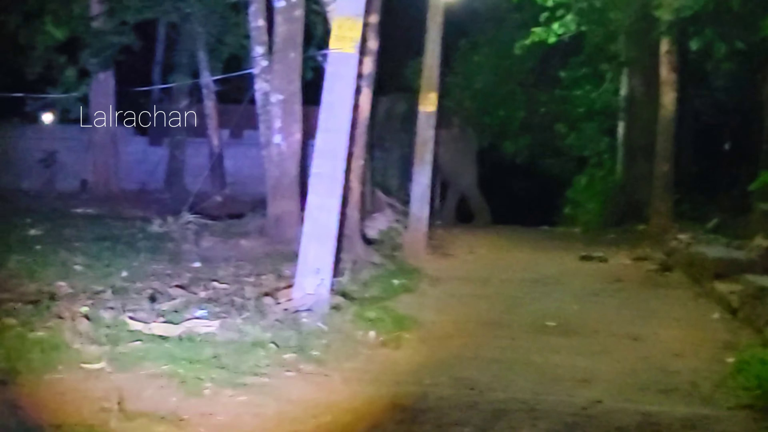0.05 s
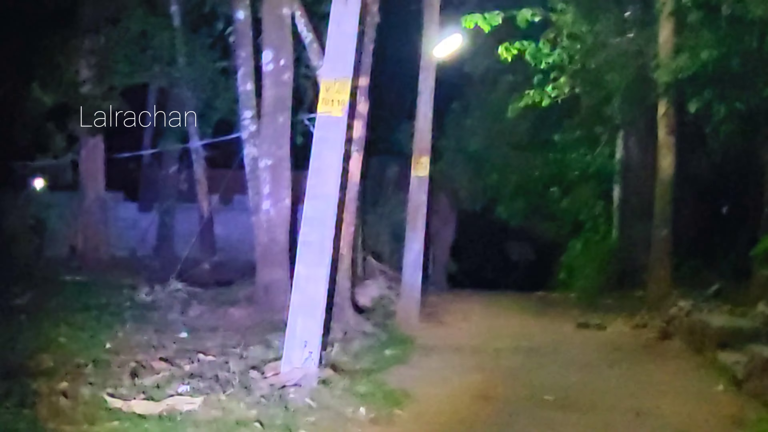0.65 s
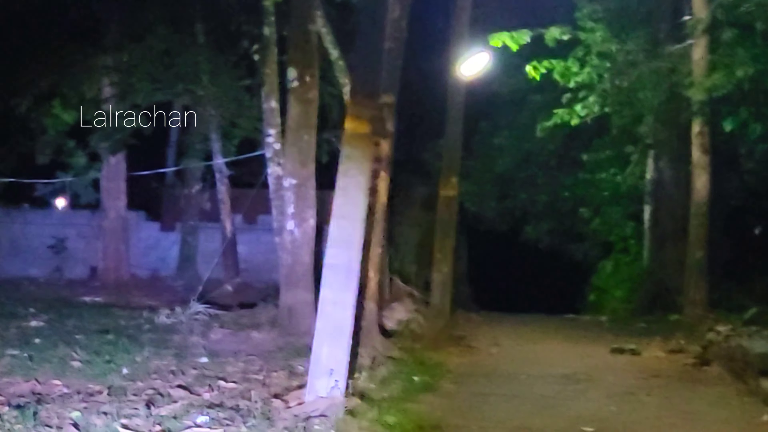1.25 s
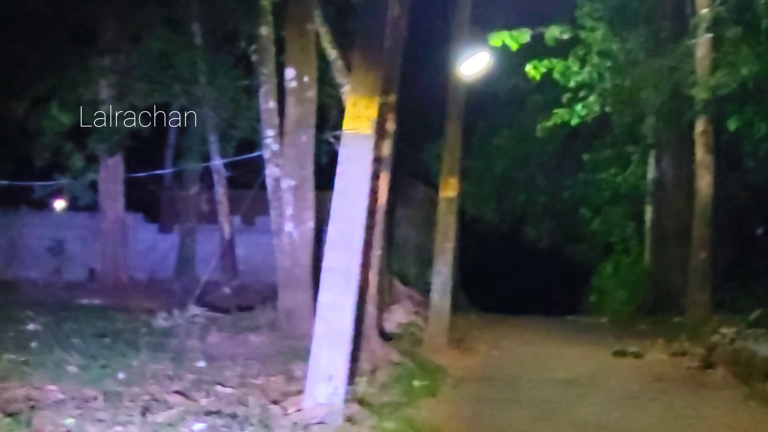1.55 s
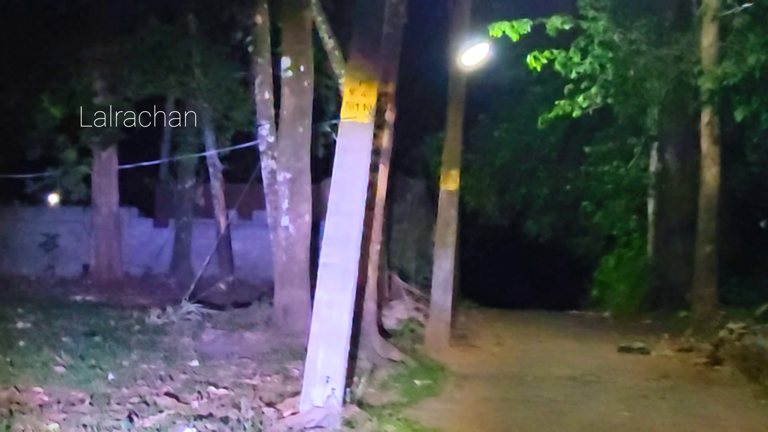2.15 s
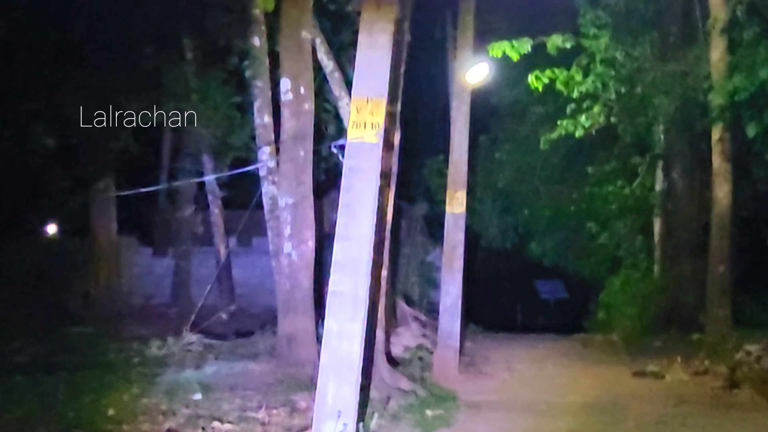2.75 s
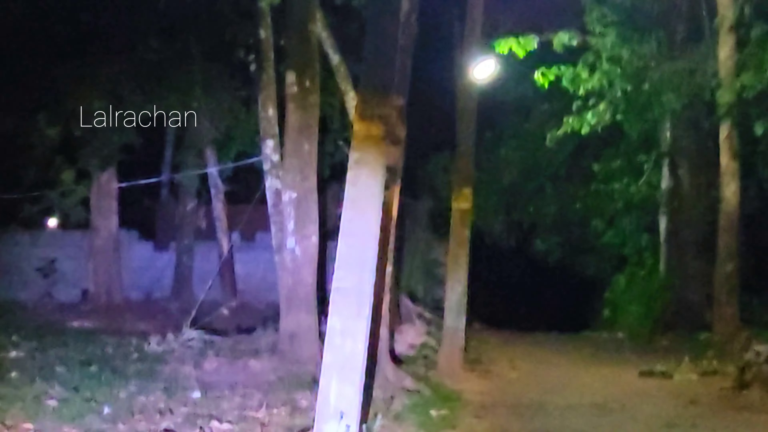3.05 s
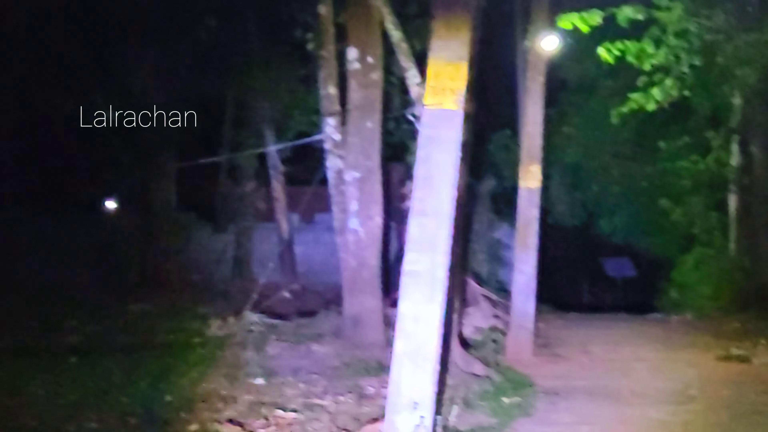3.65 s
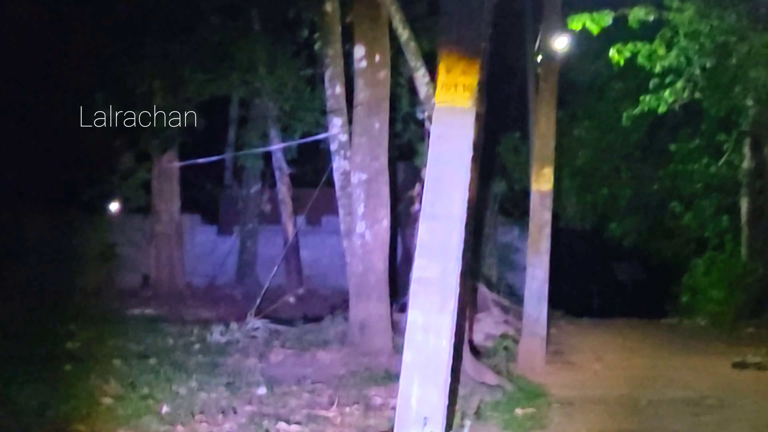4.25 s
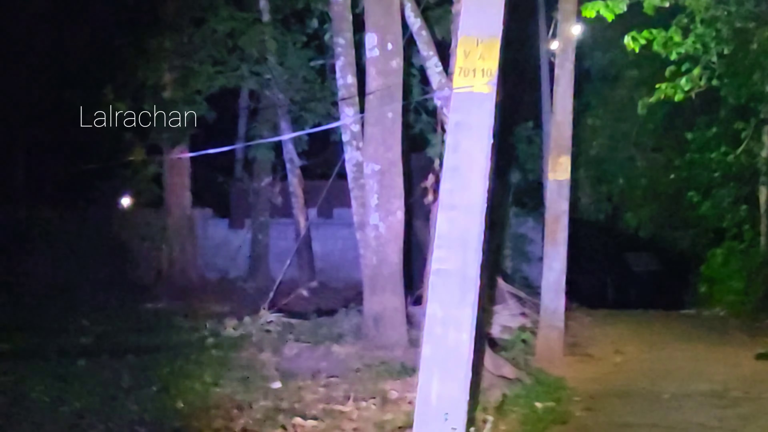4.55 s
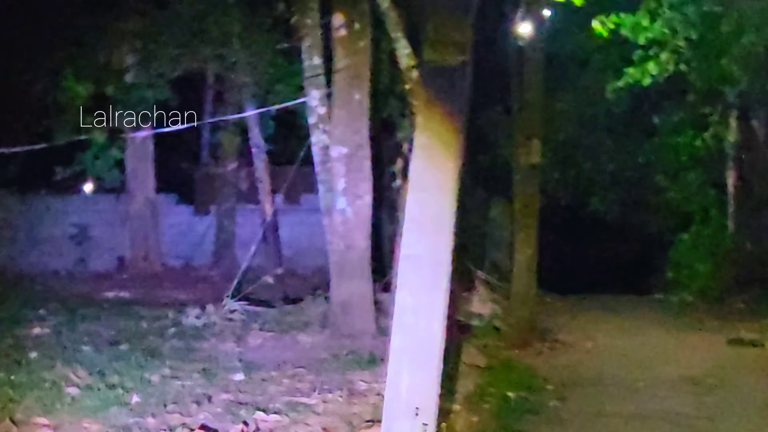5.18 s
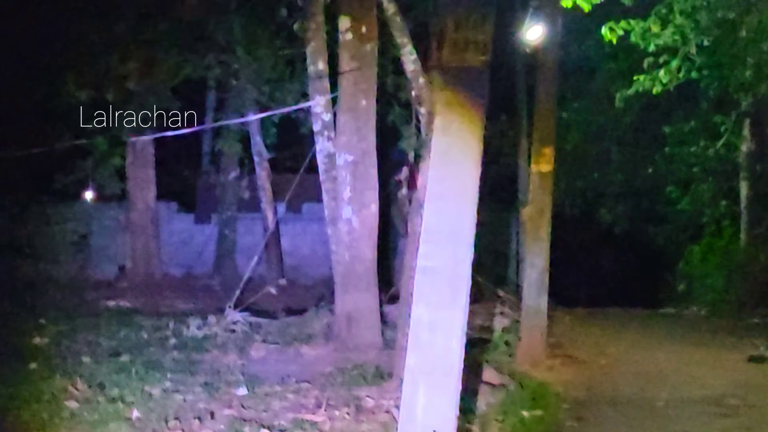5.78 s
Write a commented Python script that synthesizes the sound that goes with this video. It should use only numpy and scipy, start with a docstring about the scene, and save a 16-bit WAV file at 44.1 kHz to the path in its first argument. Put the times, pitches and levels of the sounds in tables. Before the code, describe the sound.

Slow footsteps crunch along a dirt path in night woodland for about six seconds, a little under two steps a second, close to a hand-held microphone. Soles grind grit and sand, and small stones snap sharply, most clearly at about 1.1, 2.4 and 3.9 seconds. Dry leaves give thin, bright cracks near 1.2 and 3.3 seconds. Each stride brings a dull handling knock and a faint, low rustle of clothing. The steps grow lighter after about 4.5 seconds.

Behind them, a steady, high chorus of distant insects trembles throughout, leaning to the right. One nearby cricket gives short, irregular double chirps. A higher one rasps about five times a second, dropping away briefly around 1 second and strongest near 3.8 seconds. Three faint, short, falling hoots echo through the trees at about 0.2, 3 and 4.5 seconds, over a soft hiss of air.

```python
"""Night walk in the woods

Slow steps on a dirt path, heard from a hand-held phone. Soles grind grit and sand, small stones
snap, dry leaves crack, and each stride knocks dully on the phone's case. Two nearby crickets
stroke their wings among the trees, over a steady far insect chorus, three faint hoots, soft air
and a low rustle of clothing."""
import sys
import numpy as np
from scipy import signal
from scipy.fft import rfft, irfft
from scipy.io import wavfile
from scipy.ndimage import uniform_filter1d

SR = 44100
rng = np.random.default_rng(int(sys.argv[2]) if len(sys.argv) > 2 else 0)


def transcribe(u):
    """Save the signal u as a 16-bit wav file named by the first command-line argument.

    u: samples, shape (n,) or (channels, n), limited to [-1, 1]; the rate is SR.
    q: integer samples, one column per channel.
    """
    v = np.clip(np.atleast_2d(u).T, -1, 1)
    q = np.round(v * 32767).astype(np.int16)
    wavfile.write(sys.argv[1], SR, q)


N = 261072
T = np.arange(N) / SR
FREQ = np.maximum(np.arange(N // 2 + 1) * SR / N, 1)

# footsteps, a heel strike and then the roll of the sole:
# heel_s, heel_rise_s, heel_db, roll_delay_s, roll_db, roll_fall_s, grit_offset_db, dust_offset_db
FOOTSTEPS = [(.013, 0.022, -52, 0.15, -57.5, 0.094, 4, -9.5),
             (.63, 0.025, -58, 0.075, -58.5, 0.23, 1.5, -14),
             (1.122, 0.014, -41.5, 0.048, -50, 0.093, 3.5, -6),
             (1.6, 0.063, -65, 0.082, -56, 0.18, -2.5, -4.5),
             (2.288, 0.0096, -47.5, 0.16, -57.5, 0.078, 2.5, -7),
             (2.787, 0.014, -43, 0.075, -54.5, 0.12, -3, -16),
             (3.341, 0.0097, -51, 0.13, -52, 0.055, -1, -7.5),
             (3.929, 0.0084, -45, 0.082, -56, 0.11, 3, -13),
             (4.55, 0.056, -61, 0.073, -62.5, 0.21, 0.5, -9),
             (5.048, 0.0061, -50, 0.031, -58, 0.11, -4.5, -14),
             (5.68, .015, -65.5, 0.026, -65, 0.17, 6, -1.5)]


def undb(db):
    """Decibels to gain."""
    return 10 ** (np.asarray(db) / 20)


def unit(x):
    """Scale to rms 1."""
    return x / np.sqrt(np.mean(x ** 2))


def pan(db):
    """Stereo gains for a left minus right level: negative leans right."""
    return undb(np.array([[db], [-db]]) / 2)


def colour(x, points):
    """EQ along a curve of (freq_hz, gain_db) points."""
    hz, db = np.transpose(points)
    return irfft(rfft(x) * undb(np.interp(np.log(FREQ), np.log(hz), db)), N)


def high_pass(hz, q):
    """Response of a resonant second-order high-pass."""
    s = 1j * FREQ / hz
    return s * s / (s * s + s / q + 1)


def wander(rate_hz):
    """Smooth random drift with a spread near 1."""
    hold = max(int(SR / rate_hz), 32)
    stairs = np.repeat(rng.standard_normal(N // 32 + 1)[:N // hold + 1], hold)
    return 1.3 * uniform_filter1d(uniform_filter1d(stairs, hold), hold)[:N]


def tone(hz):
    """A sine that follows a pitch curve."""
    return np.sin(2 * np.pi * np.cumsum(hz) / SR)


def add(out, start_s, x):
    """Mix x in at start_s."""
    i = max(int(start_s * SR), 0)
    out[..., i:i + x.shape[-1]] += x[..., :max(N - i, 0)]


def swell(t, peak_s, rise_s, fall_s):
    """Power of a push that builds up to peak_s and dies away."""
    age = t - peak_s
    return np.exp(-np.where(age < 0, (age / rise_s) ** 2, 2 * np.abs(age / fall_s) ** 1.03))


def swells(times, rise_s, fall_s, rest_db, swell_db):
    """Gain with a resting floor and a swell on top at each of the times."""
    t = T[::32]
    shape = np.max([swell(t, peak_s, rise_s, fall_s) for peak_s in times], axis=0)
    return np.interp(T, t, np.sqrt(undb(rest_db) ** 2 + undb(swell_db) ** 2 * shape))


def woods(x, direct_db, t60_s):
    """Trunks and leaves scatter a sound into a different tail at each microphone."""
    t = T[:SR]
    tail = rng.standard_normal((2, len(t))) * undb(-60 * t / t60_s) * (1 - np.exp(-t / 0.0008))
    tail /= np.sqrt(np.sum(tail ** 2, axis=1, keepdims=True))
    wet = signal.fftconvolve(x[None], tail, axes=1)[:, :N]
    return (undb(direct_db) * x + wet) / np.hypot(1, undb(direct_db))


def microphones(x):
    """Sound from the ground reaches the left microphone a moment earlier; the right one is brighter."""
    left = colour(x, [(500, 0), (1200, -2.5), (2400, -5.0)])
    right = colour(x, [(500, -0.5), (1200, -1.5), (2400, 4.0)])
    return np.array([left, np.roll(right, 2)])


def air_and_clothes():
    """Soft hiss on each side, a low rustle of clothing with each stride and a far hum that swells once."""
    # noise beds, the air at each side and the clothing in the centre: freq_hz, level_db
    air_left = [(20, -107), (70, -95), (300, -102), (600, -101), (1300, -104), (2500, -112), (4000, -108),
                (6000, -117), (9000, -119), (16000, -125)]
    air_right = [(20, -94), (70, -85), (180, -90), (350, -100), (1500, -107), (2400, -100), (4000, -99),
                 (6000, -103), (8600, -111), (12000, -115), (15500, -113)]
    clothes_eq = [(30, -108), (170, -94.5), (300, -100), (580, -96.5), (1000, -103), (2000, -116),
                  (5000, -135)]
    left, right, clothes = rng.standard_normal((3, N)) * np.sqrt(SR / 2)
    hum = tone(178 + 9 * wander(40)) * undb(2.0 * wander(9.3))
    hum *= swells([2.01], rise_s=0.33, fall_s=0.17, rest_db=-78.5, swell_db=-62.5)
    after_steps = [step[0] + .13 for step in FOOTSTEPS]
    strides = swells(after_steps, rise_s=0.21, fall_s=0.29, rest_db=-3, swell_db=-0.5)
    clothes = colour(clothes, clothes_eq) * strides * undb(0.67 * wander(6))
    return np.array([colour(left, air_left), colour(right, air_right)]) + clothes + hum


def far_chorus():
    """Countless far insects merge into one trembling band for each kind."""
    # insect bands: centre_hz, half_width_hz, level_db, pan_db, flutter_hz
    bands = [(3163, 167, -68, -7.5, 30), (4814, 330, -66, -8, 57), (6520, 210, -77.5, -16, 49),
             (7200, 324, -70.5, -15, 50), (9920, 470, -72, -5.5, 44)]
    out = 0
    for centre_hz, half_width_hz, level_db, pan_db, flutter_hz in bands:
        rolloff = (1 + ((FREQ - centre_hz) / half_width_hz) ** 2 / 6) ** 3
        band = unit(irfft(rfft(rng.standard_normal((2, N))) / rolloff, N))
        tremble_db = 0.63 * wander(5) + 1.86 * wander(flutter_hz)
        out = out + band * undb(level_db + tremble_db) * pan(pan_db)
    return out


def far_hoots():
    """Short, soft falling tones that echo through the trees."""
    # faint low hoots: start_s, pitch_hz, level_db
    hoots = [(0.236, 435, -56), (3.012, 430, -56), (4.55, 437, -66)]
    phase, out = np.linspace(0, 1, int(SR * .08)), np.zeros(N)
    for start_s, pitch_hz, level_db in hoots:
        glide_hz = pitch_hz * (1 + 0.23 * (.5 - phase))
        add(out, start_s, undb(level_db) * np.sin(np.pi * phase) * tone(glide_hz))
    return woods(out, direct_db=1, t60_s=0.47)


def chirping_cricket():
    """The lower cricket: two wing strokes a chirp, each falling in pitch as the wing slows."""
    # two-syllable chirps: start_s, level_db, second_offset_db
    chirps = [(.215, -48, -15), (.553, -48.5, -13), (1.235, -49, -5), (1.585, -48.5, -3.5),
              (2.32, -47.5, -10), (3.015, -49, -3), (3.46, -60, 9), (4.17, -55.5, 4), (4.685, -52, -1),
              (5.58, -51, -12)]
    pitch_hz, sweep_hz, spacing_s = 3360, 600, .043
    out, waver_hz = np.zeros(N), 90 * wander(500)
    for chirp_s, level_db, second_offset_db in chirps:
        for start_s, db in (chirp_s, level_db), (chirp_s + spacing_s, level_db + second_offset_db):
            detune, stretch = rng.standard_normal(2)
            phase = np.linspace(0, 1, int(SR * 0.0245 * np.exp(0.087 * stretch)))
            hz = pitch_hz * (1 + 0.011 * detune) + sweep_hz * (.5 - phase)
            hz += waver_hz[int(start_s * SR):][:len(phase)]
            add(out, start_s, undb(db) * np.sin(np.pi * phase) * tone(hz))
    out *= unit(undb(5 * np.clip(wander(450), -2, 1.5)))  # the teeth of the wing catch unevenly
    return undb(3.5) * woods(out, direct_db=-10, t60_s=.6) * pan(-6.5)


def rasping_cricket():
    """The higher cricket: runs of quick, uneven wing strokes in a rhythm that slowly slackens."""
    # level ride of the rasps: time_s, level_db
    ride = [(.3, -60), (.65, -89), (1.2, -84), (1.55, -63.5), (3.8, -56.5), (4.5, -61), (5.9, -62.5)]
    pitch_hz, sweep_hz, stroke_hz = 4880, 720, 90
    start_s, length_s, period_s, slowing_s = .108, 0.081, .19994, .00088
    rasp = np.abs(np.sin(np.pi * np.linspace(0, 1, int(SR * length_s)))) ** 0.29
    envelope = np.zeros(N)
    while start_s < T[-1]:
        level_db = np.interp(start_s, *np.transpose(ride)) + rng.standard_normal()
        add(envelope, start_s, undb(level_db) * rasp)
        start_s += period_s
        period_s += slowing_s
    stroke_phase = np.cumsum(stroke_hz * np.exp(.3 * wander(90))) / SR % 1
    hz = pitch_hz + sweep_hz * (.5 - stroke_phase) + 170 * wander(700)
    song = envelope * np.sin(np.pi * stroke_phase) * tone(hz)
    return undb(7.0) * woods(song, direct_db=-2, t60_s=.3) * pan(-7.5)


def handling():
    """Knocks and finger rumble cross the case, mainly to the right; the bass cut makes knocks swing."""
    # knocks as the strides jolt the hand: time_s, level_db
    knocks = [(.18, -30), (.2, -16), (0.647, -33.5), (0.726, -35), (0.8194, -19.5), (1.232, -30.5),
              (1.521, -38), (1.729, -32.5), (1.903, -20.5), (2.122, -39), (2.437, -31.5), (2.4727, -20),
              (2.858, -32.5), (2.995, -20), (3.042, -29.5), (3.543, -27), (4.123, -21.5), (4.175, -26),
              (4.6928, -20.5), (5.086, -24.5), (5.246, -25)]
    hardest_hz, hardest_db, db_per_octave = 770, -20.5, 10
    t, push = T[:2048] - .01, np.zeros(N)
    for time_s, level_db in knocks:
        # a stronger knock is a harder one, up to a limit
        hardness_hz = hardest_hz * 2 ** (min(level_db - hardest_db, 0) / db_per_octave)
        age = np.pi * hardness_hz * t
        force = np.exp(np.minimum(2.0 * age, -.8 * age))  # builds to a sharp point, lets go more slowly
        add(push, time_s + t[0] + .0005, -undb(level_db) * force)
    thumps = irfft(rfft(push) * high_pass(hz=65.5, q=1.45) * high_pass(hz=42.0, q=0.76), N)
    thumps = colour(thumps, [(70, 3.5), (160, 2.5), (400, 2), (900, 2.5), (1800, 1), (3000, 2), (6000, 5)])
    finger_eq = [(20, -16), (65, 4.5), (120, -10), (250, -15.5), (700, -19), (3000, -43)]
    fingers = unit(colour(rng.standard_normal(N), finger_eq))
    grip = swells([knock[0] for knock in knocks], rise_s=0.12, fall_s=0.13, rest_db=-67, swell_db=-56)
    fingers *= grip * undb(1.2 * wander(16))
    return (thumps + fingers) * undb([[-34], [0]])


def leaf_litter():
    """Dry leaf bits break with thin, very bright cracks; a small crumb follows every step."""
    # featured cracks: start_s, level_db
    cracks = [(1.183, -26.5), (1.187, -26), (2.436, -42), (3.252, -47), (3.339, -32), (3.938, -36),
              (4.002, -41)]
    crumbs = [(step[0] + rng.uniform(0, 0.18), -52 + rng.uniform(-8, 8)) for step in FOOTSTEPS]
    t, out = T[:1024], np.zeros((2, N))
    for start_s, level_db in list(cracks) + crumbs:
        add(out, start_s, undb(level_db) * rng.standard_normal((2, len(t))) * np.exp(-t / 0.0024))
    return colour(out, [(1000, -27), (4000, -3.5), (8000, -2.5), (11000, -2), (16000, -5)]) * pan(-2.7)


def pebbles(grit_gain, per_step):
    """Rows for stones(): pebbles slip at random as a sole rolls, louder where it grinds harder."""
    span_s, over_grit_db, centre_hz, spread_octaves, tick_db = .17, 13.5, 1400, 0.67, -12.5
    heel_s = np.repeat([step[0] for step in FOOTSTEPS], per_step)
    start_s = heel_s + span_s * rng.random(len(heel_s))
    size, pitch = np.clip(rng.standard_normal((len(heel_s), 2)), -1.5, 1.5).T
    level_db = 20 * np.log10(np.interp(start_s, T, grit_gain)) + over_grit_db + 3 * size
    pitch_hz = centre_hz * 2 ** (spread_octaves * pitch)
    return list(zip(start_s, level_db, pitch_hz, np.full(len(heel_s), tick_db)))


def stones(grit_gain):
    """A stone slips: a knock of two or three cycles, damped by the earth, with a splintery tick."""
    # featured snaps under a sole: start_s, level_db, pitch_hz, tick_offset_db
    snaps = [(.049, -31.5, 930, -22), (.1228, -27.5, 2010, -2.5), (.708, -39.5, 1680, -4),
             (.96, -39.5, 2210, -1.5), (1.1023, -23, 705, -13), (1.116, -40, 900, -14),
             (1.124, -21, 1020, -11), (1.182, -25, 1150, -2.5), (1.325, -35.5, 1520, -1),
             (2.274, -38.5, 2500, 0), (2.321, -28.5, 1220, -2.5), (2.353, -33, 1260, -6),
             (2.3887, -10, 1170, -35), (2.7965, -31.5, 2270, -2), (3.338, -44, 1480, 3),
             (3.44, -33.5, 850, -18), (3.4597, -23.5, 1230, -12), (3.5454, -38, 3100, 5),
             (3.871, -41.5, 2420, 7), (3.9205, -29, 1670, -5), (3.9237, -14, 1480, -6.5),
             (3.925, -14.5, 780, -15), (3.9376, -20.5, 1240, -9), (3.9484, -16.5, 676, -10.5),
             (5.047, -41.5, 3070, -1), (5.721, -41, 1380, -3)]
    # tone of the tick: freq_hz, gain_db
    tick_eq = [(100, -39), (1000, 8), (3000, 7.5), (5000, -3.5), (7500, 0.5), (10000, -19), (16000, -10)]
    t, knocks, ticks = T[:2048], np.zeros(N), np.zeros((2, N))
    tick_decay = np.exp(-t / 0.00058) + 0.098 * np.exp(-t / 0.016)
    for start_s, level_db, pitch_hz, tick_offset_db in list(snaps) + pebbles(grit_gain, per_step=6):
        half_cycles = 2 * pitch_hz * t
        envelope = (half_cycles * np.exp(1 - half_cycles)) ** 1.19
        add(knocks, start_s, undb(level_db) * envelope * np.sin(2 * np.pi * pitch_hz * t))
        tick = rng.standard_normal((2, len(t))) * tick_decay
        add(ticks, start_s, undb(level_db + tick_offset_db) * tick)
    knocks = colour(knocks, [(100, 0), (400, -10.5), (900, 0.5), (1800, 0.5), (4000, 10)])
    near = microphones(knocks) + colour(ticks, tick_eq) * pan(-7.5)
    return near + undb(-21.0) * woods(near.mean(axis=0), direct_db=-33, t60_s=0.44)


def footwork():
    """Gains of grit, sand and dust over time: heels strike, soles roll, a swinging foot skims."""
    # skims over the sand: peak_s, level_db, rise_s, fall_s
    skims = [(3.66, -59, .16, 0.47), (5.42, -64, 0.28, 0.28)]
    # balance of grit, sand and dust in dB: the heel grinds more grit and sand, the roll is dustier
    heel_mix, roll_mix, skim_mix = np.array([(1, 2, -1.5), (-1.5, 0, -0.5), (-10.5, -0.5, -11.5)])
    t, power = T[::32], 0
    for heel_s, rise_s, heel_db, delay_s, roll_db, fall_s, grit_db, dust_db in FOOTSTEPS:
        heel = undb(heel_db + heel_mix)[:, None] ** 2 * swell(t, heel_s, rise_s, fall_s=0.023)
        roll = undb(roll_db + roll_mix)[:, None] ** 2 * swell(t, heel_s + delay_s, 0.76 * delay_s, fall_s)
        power += undb([grit_db, 0, dust_db])[:, None] ** 2 * (heel + roll)
    for peak_s, level_db, rise_s, fall_s in skims:
        power += undb(level_db + skim_mix)[:, None] ** 2 * swell(t, peak_s, rise_s, fall_s)
    return [np.interp(T, t, gain) for gain in np.sqrt(power)]


def grains(per_second, spread_db):
    """Dense tiny impacts of random size."""
    size = undb(spread_db * np.minimum(rng.exponential(size=N), 4))
    return unit((rng.random(N) < per_second / SR) * size * rng.standard_normal(N))


def scuffs(grit_gain, sand_gain, dust_gain):
    """A sole grinds grit, sand and dust; the finer the grain, the less alike the two sides."""
    # tone of each grain size, coarse to fine: freq_hz, gain_db
    grit_eq = [(30, -7), (100, -2), (300, -1), (700, 1.5), (1200, 2), (1700, 0), (2300, -3), (4000, -11),
               (16000, -57)]
    sand_eq = [(200, -43), (1200, -3.5), (2200, -4), (3100, 4.5), (4200, 1.5), (6000, -4.5), (7500, -3.5),
               (9000, -16), (16000, -21)]
    dust_eq = [(500, 6), (3000, -25), (6000, 8), (9000, 0.5), (13000, 2), (16000, 1)]
    # the sole sticks and slips, so the grains come in quick clusters
    slip = unit(undb(3.4 * np.clip(wander(240), -2, 1.7)))
    grit = unit(colour(slip * grains(per_second=3200, spread_db=2.5), grit_eq))
    shared = grains(per_second=1500, spread_db=3.5)
    sand = np.array([grains(per_second=6000, spread_db=3.5) + 0.18 * shared for _ in range(2)])
    sand = unit(colour(slip ** 0.76 * sand, sand_eq)) * pan(-6.0)
    dust = np.array([grains(per_second=9000, spread_db=-0.5) for _ in range(2)])
    dust = unit(colour(slip ** 0.49 * dust, dust_eq)) * pan(-8.5)
    return microphones(grit_gain * grit) + sand_gain * sand + undb(3.0) * dust_gain * dust


def scene():
    """The walker in the night woods."""
    grit_gain, sand_gain, dust_gain = footwork()
    walker = scuffs(grit_gain, sand_gain, dust_gain) + stones(grit_gain) + leaf_litter() + handling()
    wildlife = chirping_cricket() + rasping_cricket() + far_chorus() + far_hoots()
    return walker + wildlife + air_and_clothes()


def record(dry):
    """The phone cuts the highest treble with a steep low-pass."""
    cutoff_hz = 15850
    return signal.sosfilt(signal.ellip(10, .2, 70, cutoff_hz, fs=SR, output="sos"), dry)


dry = scene()
out = record(dry)
transcribe(out)
```